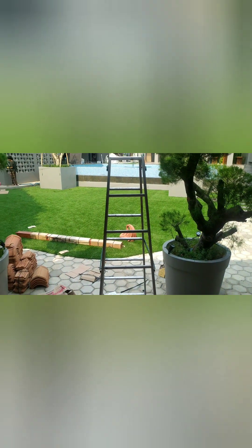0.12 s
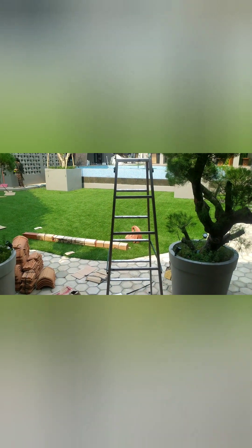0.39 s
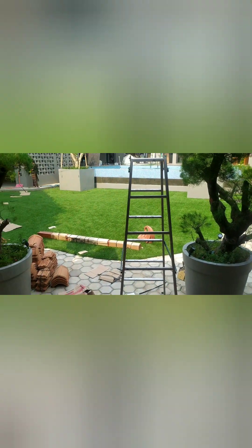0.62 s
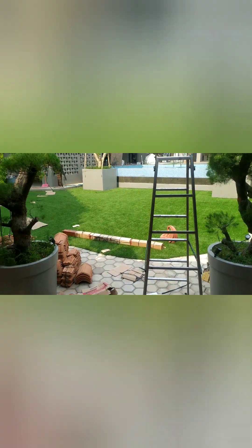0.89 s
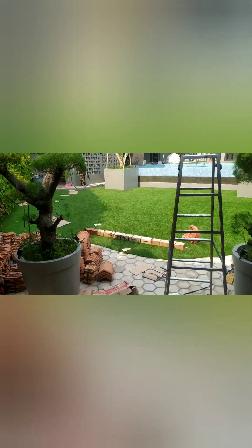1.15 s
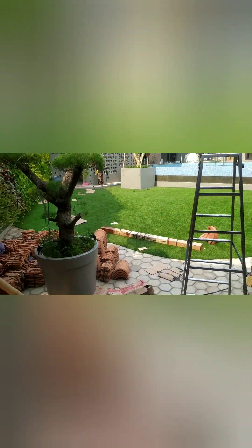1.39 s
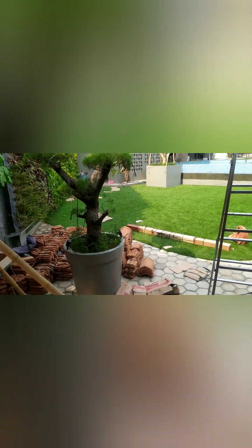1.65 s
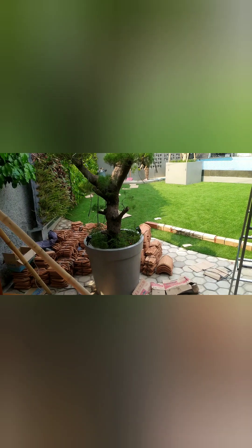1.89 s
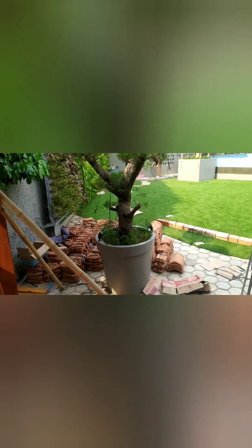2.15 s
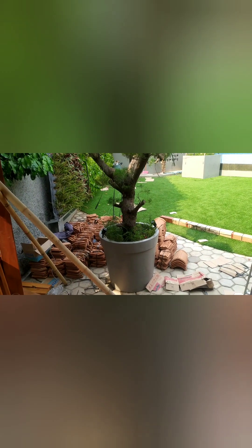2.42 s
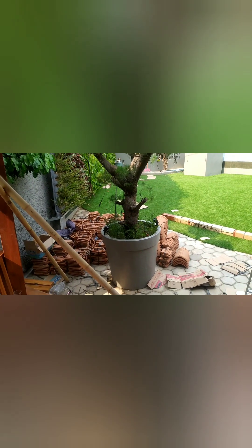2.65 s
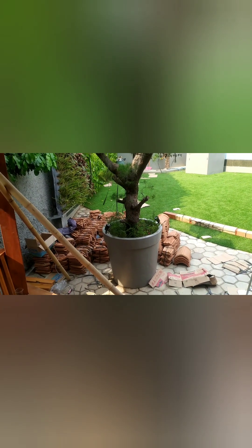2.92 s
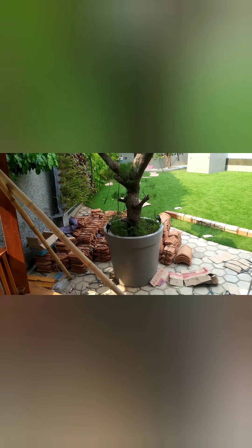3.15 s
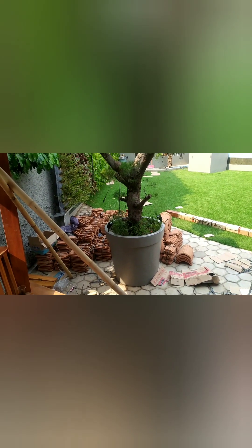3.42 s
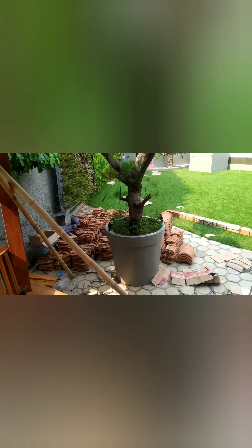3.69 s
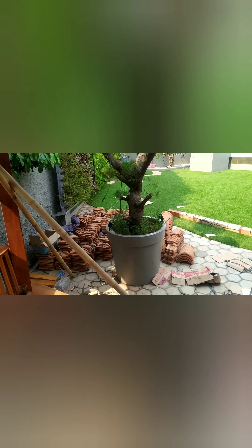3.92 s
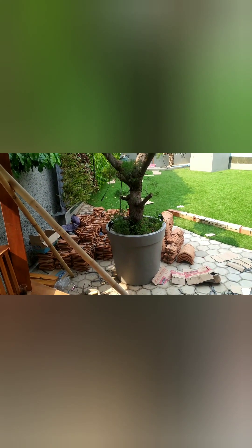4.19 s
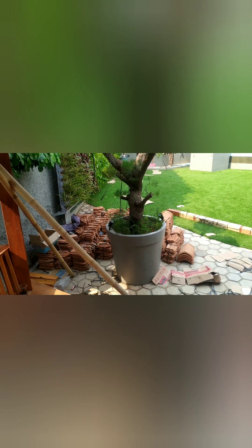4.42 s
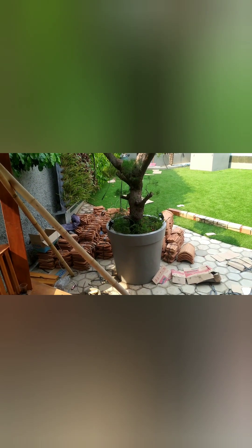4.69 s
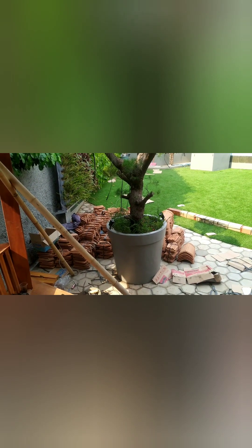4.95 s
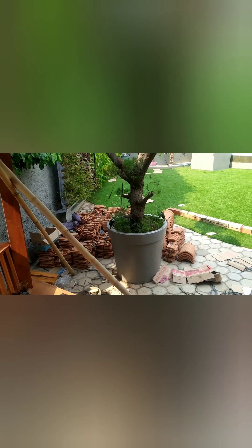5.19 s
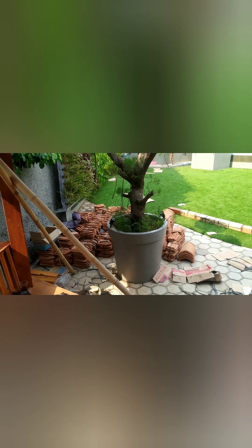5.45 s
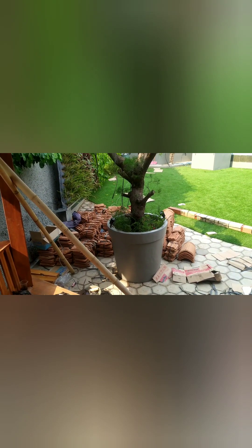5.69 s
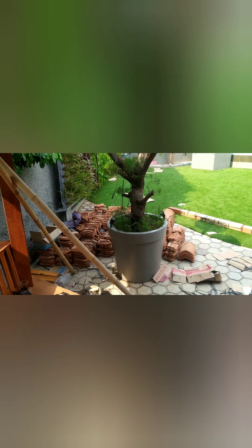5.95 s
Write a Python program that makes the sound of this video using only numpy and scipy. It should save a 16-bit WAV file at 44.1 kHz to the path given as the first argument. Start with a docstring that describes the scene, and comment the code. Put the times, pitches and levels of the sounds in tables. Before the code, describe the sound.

Soft footsteps and handling knocks on hollow wooden boards, hissing rubs between, then a heavy load drags, shudders and drops with a loud bump.

```python
"""Someone moves about on a hollow wooden floor in a small hard room, near a two-port microphone: heels and
weight thump the boards, hard knocks and bright ticks fall, as ringing modes and noise bursts in a room tail.
Rough surfaces rub in soft hissing strokes of grainy noise. Last a heavy load is dragged, shudders and drops:
uneven slip noise through its resonances. A throbbing low rumble and a faint airy hiss lie under it all."""
import sys
import numpy as np
from scipy import signal
from scipy.fft import rfft, irfft
from scipy.io import wavfile
from scipy.ndimage import uniform_filter1d

SR = 44100
rng = np.random.default_rng(int(sys.argv[2]) if len(sys.argv) > 2 else 0)


def unload_audio(sound):
    """Save the sound as a 16-bit wav file, at the path given as the first command line argument."""
    columns = np.transpose(np.atleast_2d(sound))
    # keep every value between -1 and 1, then stretch to whole-number steps
    steps = np.round(np.clip(columns, -1, 1) * 32767)
    wavfile.write(sys.argv[1], SR, steps.astype(np.int16))


def nominal_scale(level):
    """Amplitude ratio for a level in decibels (scalar or array-like)."""
    x = np.asarray(level, float) / 20
    return 10 ** x


N = 268126  # samples, about 6.1 s


def unit(x):
    """Scale so that the mean of the channels has rms 1."""
    return x / np.sqrt(np.mean(np.atleast_2d(x).mean(0) ** 2))


def decay(t, t60):
    """Exponential fade by 60 dB in t60 seconds."""
    return np.exp(-np.log(1000) * t / t60)


def smooth_twice(x, length):
    """Two running means of the same length in samples."""
    return uniform_filter1d(uniform_filter1d(x, length), length)


def colour(x, points):
    """Shape a spectrum by (Hz, dB) points, joined along log frequency."""
    hz, db = np.transpose(points)
    bins = np.fft.rfftfreq(x.shape[-1], 1 / SR) + 1e-3
    gain_db = np.interp(np.log(bins), np.log(hz), db, left=-90, right=-90)
    return irfft(rfft(x) * nominal_scale(gain_db), x.shape[-1])


def walk(rate):
    """Random levels held 1 / rate s and slewed twice; spread near 1."""
    hold = int(SR / rate)
    levels = np.repeat(rng.standard_normal(N // hold + 1), hold)
    return unit(smooth_twice(levels, hold)[:N])


PORT_GAP_M = 0.12


def diffuse(mid, side):
    """Sound from all round: the two ports agree in the bass and part once the wave is as short as their gap."""
    hz = np.fft.rfftfreq(len(mid), 1 / SR)
    alike = .985 * np.sinc(2 * hz * PORT_GAP_M / 343)  # speed of sound in m/s
    shared = rfft(mid) * np.sqrt((1 + alike) / 2)
    opposed = rfft(side) * np.sqrt((1 - alike) / 2)
    return irfft(np.array([shared + opposed, shared - opposed]), len(mid))


# Swell of the rumble through the floor. Each row: time in seconds, level in dB before the throb.
RUMBLE_SWELL = [(0.0, -73), (0.14, -57), (0.45, -53.5), (0.71, -56), (1.5, -59), (1.73, -59), (2.05, -59),
                (2.21, -55), (2.41, -61.5), (3.11, -63.5), (3.39, -47), (3.5, -37), (3.58, -44.5),
                (3.78, -57), (4.68, -58), (5.0, -64), (5.22, -57.5), (5.75, -52), (5.9, -56), (6.08, -46.5)]
# Spectrum of the rumble. Each row: frequency in Hz, relative density in dB per Hz.
RUMBLE_SPECTRUM = [(15, -41), (25, -14), (39, -15.5), (59, -1), (73, -3), (140, -13.5), (180, -43),
                   (310, -120)]


def rumble():
    """Low noise from all round that swells and throbs unevenly."""
    noise = unit(diffuse(*colour(rng.standard_normal((2, N)), RUMBLE_SPECTRUM)))
    level_db = np.interp(np.arange(N) / SR, *np.transpose(RUMBLE_SWELL))
    swell = uniform_filter1d(nominal_scale(level_db), SR // 30)
    throb = nominal_scale(2.5 * walk(12))
    return swell * throb * noise


# Spectrum of the faint hiss of the air. Each row: frequency in Hz, relative density in dB per Hz.
AIR_SPECTRUM = [(70, -27), (120, -8.5), (170, 2), (250, -4), (400, -10), (630, -12), (1000, -18),
                (1300, -18), (2000, -17.5), (3200, -20.5), (4200, -17.5), (7500, -20.5), (10000, -22.5),
                (13000, -28.5), (15600, -28)]
AIR_DB = -60.5  # middle level


def air():
    """Smooth noise from all round with a slight flutter."""
    noise = unit(diffuse(*colour(rng.standard_normal((2, N)), AIR_SPECTRUM)))
    return nominal_scale(AIR_DB + 0.42 * walk(6.85)) * noise


# Rubbing strokes close by. Each row: start, hardest press and end in seconds, hiss level in dB,
# lower rasp against that hiss in dB.
RUB_STROKES = [(-.25, -0, .15, -63, -29), (0.02, 0.203, .34, -60, -20), (.2, 0.378, .42, -63, -17),
               (0.677, 0.74, .77, -66, -9), (0.775, 0.848, .95, -59, -9.5), (0.864, 0.948, 1.07, -62.5, -3),
               (1.295, 1.303, 1.34, -63.5, 4), (1.383, 1.44, 1.49, -63, -25), (1.702, 1.723, 1.75, -69, -1),
               (1.758, 1.907, 2.03, -55, -8), (2.037, 2.086, 2.13, -66.5, -2.5),
               (2.353, 2.462, 2.6, -59.5, -3.5), (2.414, 2.58, 2.66, -54, -10.5),
               (2.596, 2.618, 2.75, -57, -4), (2.87, 2.932, 3.06, -50, -28), (3.03, 3.076, 3.13, -65, -2),
               (3.137, 3.223, 3.34, -57, -9), (3.234, 3.332, 3.37, -49, -4.5),
               (3.33, 3.396, 3.48, -50.5, -11.5), (3.476, 3.481, 3.54, -50, 0.5),
               (3.49, 3.535, 3.64, -60, -1.5), (4.15, 4.196, 4.26, -68, -13), (4.75, 4.782, 4.81, -70, -6),
               (5.235, 5.242, 5.31, -49.5, -5), (5.27, 5.332, 5.38, -63, -18)]
STROKE_ENDS_DB, STROKE_ROUND = -14, 1.73  # level at both ends against the hardest press; roundness of the top


def strokes():
    """Each stroke presses harder, then lets go: gains of hiss and rasp."""
    t = np.arange(N) / SR
    hiss_power, rasp_power = np.zeros((2, N))
    for start, top, end, db, rasp_db in RUB_STROKES:
        # 0 at the hardest press, 1 at the ends
        away = np.where(t < top, (top - t) / (top - start), (t - top) / (end - top))
        power = nominal_scale(2 * (db + STROKE_ENDS_DB * away ** STROKE_ROUND))
        hiss_power += power
        rasp_power += power * nominal_scale(2 * rasp_db)
    return uniform_filter1d(np.sqrt([hiss_power, rasp_power]), SR // 150)


# Spectrum of the rubbing hiss. Each row: frequency in Hz, relative density in dB per Hz.
HISS_SPECTRUM = [(2060, -15.5), (3500, -12.5), (4870, -11.5), (8000, -2.5), (11100, -4), (13600, -7),
                 (14900, -6), (16000, -9)]
# Spectrum of the lower rasp. Each row: frequency in Hz, relative density in dB per Hz.
RASP_SPECTRUM = [(900, -5), (1400, -10), (1720, -0.5), (2100, -7), (3500, -5), (5000, -6.5), (7000, -14)]


def rub():
    """Countless tiny catches of two rough surfaces, heard from all round; the grain is uneven."""
    hiss_gain, rasp_gain = strokes()
    grain_db = 2.1 * rng.exponential(size=N) + 1.3 * walk(40)
    catches = rng.standard_normal((4, N)) * nominal_scale(grain_db)
    hiss = unit(diffuse(*colour(catches[:2], HISS_SPECTRUM)))
    rasp = unit(diffuse(*colour(catches[2:], RASP_SPECTRUM)))
    return hiss_gain * hiss + rasp_gain * rasp


# Modes the floor rings with. Each row: part (0 joists, 1 panel, 2 boards, 3 board overtones), middle frequency
# in Hz, relative level in dB before the struck place alters it, t60 in seconds at ring length share 1.
FLOOR_MODES = [(0, 57.2, -10.5, 0.74), (0, 83.8, -9, 0.16), (1, 112.4, -5, 0.43), (1, 167.4, 8.5, 0.43),
               (1, 215.4, -15, 1), (2, 305, 1.5, 0.17), (2, 342.4, 2.5, 0.065), (2, 402, 0, 0.11),
               (2, 475, -4, 0.11), (2, 582, 2, 0.031), (2, 626, -10.5, 0.23), (3, 779, 2.5, 0.024),
               (3, 912, 12, 0.012), (3, 1043, 4.5, 0.012), (3, 1220, -9, 0.014), (3, 1386, -2, 0.059),
               (3, 1710, -10, 0.017), (3, 2340, -43, 0.0084)]
PLACE_DB = 4.5  # spread of mode levels with the struck place for part 3, less for lower parts
FAVOUR_DB, FAVOUR_OCTAVES, FAVOUR_RING = 9, .16, 1.5  # lift, reach, added ring length share


def ring(part, place, share, contact, spot_hz):
    """One floor part after a push; modes near the favoured pitch ring louder and longer; first 40 ms at rms 1."""
    t = np.arange(SR if part < 2 else SR // 3) / SR  # the boards are silent sooner
    modes = 0
    for (mode_part, hz, db, t60), (level_shift, pitch_shift) in zip(FLOOR_MODES, place):
        if mode_part == part:
            near = np.exp(-(np.log2(hz / spot_hz) / FAVOUR_OCTAVES) ** 2)
            fade = decay(t, t60 * share * (1 + FAVOUR_RING * near))
            level = nominal_scale(db + PLACE_DB * level_shift * part / 3 + FAVOUR_DB * near)
            pitch = hz * (1 + .012 * part * pitch_shift)
            modes = modes + level * fade * np.sin(2 * np.pi * pitch * t)
    y = np.pad(signal.fftconvolve(modes, contact), (0, SR))[:SR]
    return y / np.sqrt(np.mean(y[:SR // 25] ** 2))


def blow(part_db, share, spot_hz):
    """One second of a blow on its own place: a soft push moves joists and panel, a gritty contact the boards."""
    place = rng.standard_normal((len(FLOOR_MODES), 2))
    t = np.arange(SR // 20) / SR
    grit = rng.standard_normal(len(t)) * np.exp(-t / 0.021)
    grit[0] = 14  # the first touch is the hardest
    push = np.hanning(int(0.005 * SR))
    return sum(nominal_scale(db) * ring(part, place, share, push if part < 2 else grit, spot_hz)
               for part, db in part_db.items())


# Soft thumps of heels and weight on the floor. Each row: start in seconds, joists level in dB,
# panel level in dB, ring length share.
FLOOR_THUMPS = [(0.564, -43, -47, 0.21), (0.801, -59, -70, 1.6), (0.939, -51, -30.5, 0.67),
                (1.553, -36.5, -49, 1.07), (1.966, -46, -64, 1.14), (2.289, -44.5, -70, 0.65),
                (2.601, -49.5, -60, 1.6), (3.11, -52, -69, 1.1), (3.334, -41.5, -50, 0.82),
                (3.489, -32, -38.5, 0.79), (3.697, -51, -70, .62), (4.039, -45.5, -49.5, 0.57),
                (4.253, -50.5, -68, 0.86), (4.596, -48.5, -63.5, 1.6), (5.624, -25.5, -28.5, 0.69)]
THUMP_BOARDS_DB = -13.5  # boards against the panel


def thumps():
    """Soft weight drives joists and panel, and the boards join in more faintly."""
    out = np.zeros(N + SR)
    for start, joists, panel, share in FLOOR_THUMPS:
        i = int(start * SR)
        part_db = {0: joists, 1: panel, 2: panel + THUMP_BOARDS_DB}
        out[i:i + SR] += blow(part_db, share, spot_hz=480)
    return out[:N]


# Hard knocks on the boards. Each row: start in seconds, boards level in dB, board overtones level in dB,
# ring length share, frequency in Hz that the struck spot favours.
BOARD_KNOCKS = [(.654, -59, -62.5, 2.1, 775), (0.801, -60.5, -68, 3, 475), (1.115, -62.5, -79, .8, 520),
                (1.212, -48.5, -60.5, 1.1, 310), (1.306, -49, -57.5, 0.36, 363),
                (1.538, -60.5, -64.5, 0.38, 1650), (1.967, -61, -66.5, 1.1, 970),
                (2.289, -60.5, -78, 0.84, 305), (2.619, -59.5, -57.5, 0.55, 2200),
                (3.084, -62, -60.5, 0.6, 960), (3.108, -53.5, -59, 0.47, 324),
                (3.308, -62, -59.5, 1.4, 985), (3.403, -61.5, -57, 0.94, 1140),
                (3.481, -50, -54.5, 0.77, 1670), (3.488, -43, -58, 0.66, 480),
                (3.697, -64, -62.5, 0.28, 970), (3.776, -59, -51.5, 2.1, 1040),
                (4.006, -61.5, -71, 0.38, 620), (5.18, -78, -72, .6, 1470),
                (5.242, -53.5, -56.5, 0.78, 1490), (5.312, -43.5, -48.5, 1.8, 470),
                (5.358, -33.5, -44.5, 1.4, 332), (5.392, -28.5, -38, 1.33, 1700),
                (5.543, -33, -41.5, 1.2, 910), (5.614, -27.5, -33, 0.35, 600), (5.624, -28, -24, 0.37, 774)]
KNOCK_PANEL_DB = -10.5  # panel against the boards


def knocks():
    """A hard contact rings the boards and their overtones, with the panel fainter beneath."""
    out = np.zeros(N + SR)
    for start, boards, overtones, share, spot_hz in BOARD_KNOCKS:
        i = int(start * SR)
        part_db = {1: boards + KNOCK_PANEL_DB, 2: boards, 3: overtones}
        out[i:i + SR] += blow(part_db, share, spot_hz)
    return out[:N]


# Sharp ticks of hard edges. Each row: start in seconds, starting level in dB.
EDGE_TICKS = [(1.5354, -52.5), (3.479, -39), (5.612, -35), (5.621, -15.5)]
# Spectrum of a tick. Each row: frequency in Hz, relative density in dB per Hz.
TICK_SPECTRUM = [(2000, -21), (3500, 0.5), (4800, 1), (8000, 6.5), (11000, -11.5), (15000, -13)]
TICK_T60_S = 0.016


def ticks():
    """Short bright noise bursts that start at once and die away."""
    t = np.arange(N) / SR
    grit = unit(colour(rng.standard_normal(N), TICK_SPECTRUM))
    return grit * sum(nominal_scale(db) * (t >= start) * decay(np.abs(t - start), TICK_T60_S) for start, db in EDGE_TICKS)


ROOM_T60_S, ROOM_TREBLE_T60_S, ROOM_DB = 0.28, 0.14, -0.5


def room(x):
    """Direct sound plus a dense tail from the walls, the treble dying first."""
    t = np.arange(SR) / SR
    noise = diffuse(*rng.standard_normal((2, SR)))
    body = colour(noise, [(150, -16.5), (400, 0.5), (2000, -2.0), (5000, -14)]) * decay(t, ROOM_T60_S)
    treble = colour(noise, [(1500, 2), (4000, 1.5), (20000, 5)]) * decay(t, ROOM_TREBLE_T60_S)
    onset = np.clip(t / 0.0043, 0, 1)
    tail = (body + treble) * onset * np.sqrt(2 * np.log(1000) / ROOM_T60_S / SR)
    return x + nominal_scale(ROOM_DB) * signal.fftconvolve(x[None], tail, axes=1)[:, :N]


# Jolts of the load, dragged and then dropped. Each row: start in seconds, level in dB, boom against that level
# in dB, hardness in dB per part above the hollow, ring length share.
LOAD_JOLTS = [(5.246, -49, 6, -2, 1.2), (5.265, -42, 8, 2.5, 1.3), (5.299, -41, 12, -2.5, 0.93),
              (5.318, -38, 3, -0.5, 0.88), (5.357, -28, 4.5, -1, 1.7), (5.388, -17, -9.5, -2.5, 0.87),
              (5.42, -24, -2, -3.5, 1.4), (5.46, -32.5, 4.5, 2, 1.), (5.502, -36.5, 9, 3, 2.4),
              (5.542, -25, 4, -1.5, 1.13), (5.575, -45, 2, 5.5, 1.8), (5.612, -18.5, 0, 2, 0.56),
              (5.631, -14.5, 2, -0.5, 0.98), (5.657, -19, 4.5, -4, 0.86), (5.683, -25, -3, -3.5, 1.3)]
JOLT_RISE_S = 0.0025
# How boom, hollow, knock, clatter and scrape of the load take a jolt. Each row: level in dB against the jolt,
# t60 in seconds at ring length share 1.
LOAD_RESPONSE = [(-2.5, 0.29), (-1, 0.27), (-4, 0.25), (-13.5, 0.39), (-25.5, 0.43)]


def shaking(part):
    """How hard one load part shakes: each jolt rises fast and dies away; hard jolts favour the upper parts."""
    first = int(LOAD_JOLTS[0][0] * SR)
    t = np.arange(first, N) / SR
    part_db, t60 = LOAD_RESPONSE[part]
    power = 0
    for start, db, boom_db, hard_db, share in LOAD_JOLTS:
        tilt_db = hard_db * (part - 1) if part else boom_db
        rise = np.clip((t - start) / JOLT_RISE_S, 0, 1)
        fade = decay(np.abs(t - start), t60 * share)
        power = power + nominal_scale(2 * (db + part_db + tilt_db)) * (rise * fade) ** 2
    return np.pad(np.sqrt(power), (first, 0))


# Resonances of the load. Each row: part (0 boom, 1 hollow, 2 knock, 3 clatter, 4 scrape), frequency in Hz,
# width in Hz of a single pass, relative level in dB.
LOAD_RESONANCES = [(0, 60, 29.6, 8), (0, 78.7, 25, 7), (1, 161, 38.6, -1), (1, 219.8, 43.3, -5.5),
                   (2, 317, 69, 7), (2, 428, 87, -0.5), (2, 468, 91.5, -10), (2, 602, 91, -8.5),
                   (3, 764, 155, 2), (3, 960, 144, 3), (3, 1290, 400, -7), (3, 1722, 279, -3.5),
                   (3, 2207, 574, -10.5), (4, 2590, 890, 8.5), (4, 4650, 1840, 6), (4, 6300, 5000, 0)]


def drag():
    """Uneven slips and bounces shake the resonances of the heavy load."""
    hz = np.fft.rfftfreq(N, 1 / SR)
    slips = rfft(diffuse(*rng.standard_normal((2, N)) * nominal_scale(2.7 * walk(45))))
    out = 0
    for part in range(len(LOAD_RESPONSE)):
        body = 0
        for own_part, f, width, db in LOAD_RESONANCES:
            if own_part == part:
                resonance = width * hz / (1j * (hz ** 2 - f ** 2) + width * hz)
                body = body + nominal_scale(db) * resonance ** 2  # twice over: steep flanks
        out = out + shaking(part) * unit(irfft(slips * body, N))
    return out


# The shudder of the stuck load. One row: start and end in seconds, frequency in Hz,
# last peak in dB before smoothing, growth in dB.
LOAD_SHUDDER = (5.357, 5.391, 163, -9, 15)


def shudder():
    """Once, the load sticks and swings harder at one pitch until it breaks free."""
    t = np.arange(N) / SR
    start, end, hz, peak_db, growth_db = LOAD_SHUDDER
    to_go = np.clip((end - t) / (end - start), 0, 1)
    swing = nominal_scale(peak_db - growth_db * to_go) * ((t > start) & (t < end))
    swing = smooth_twice(swing, SR // 500)  # it lets go within a few ms
    return swing * np.cos(2 * np.pi * hz * (t - end + 0.0042))


def scene():
    """Blows and ticks in the room, over the load, rubbing and background."""
    return room(thumps() + knocks() + ticks()) + drag() + shudder() + rub() + rumble() + air()


def low_pass(x):
    """Removes everything above the highest recorded frequency."""
    return signal.sosfilt(signal.butter(12, 16470, fs=SR, output="sos"), x)


RIGHT_DB, LEFT_LAG = 1.23, 9  # right port above left; left port later, in samples
MIC_LOW_HZ, TOP_HZ = 46.4, 15500


def record(dry):
    """The right port is a little nearer and louder; the lowest bass and the top are cut."""
    x = dry * nominal_scale(np.array([[-RIGHT_DB], [RIGHT_DB]]) / 2)
    x[0] = np.roll(x[0], LEFT_LAG)
    x = signal.sosfilt(signal.butter(6, MIC_LOW_HZ, "high", fs=SR, output="sos"), x)
    x = signal.sosfilt(signal.ellip(10, .2, 60, TOP_HZ, fs=SR, output="sos"), x)
    return low_pass(x)


dry = scene()
out = record(dry)
unload_audio(out)
```